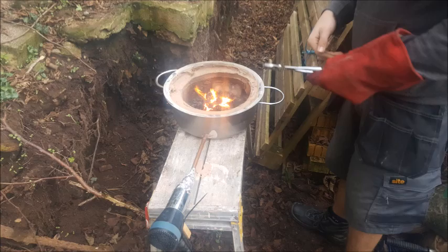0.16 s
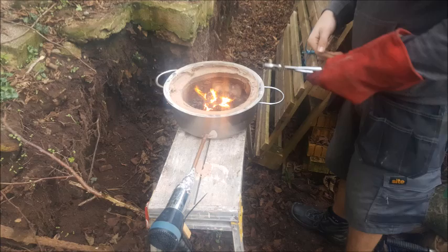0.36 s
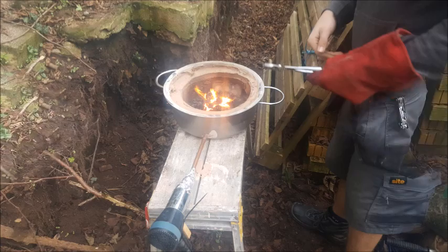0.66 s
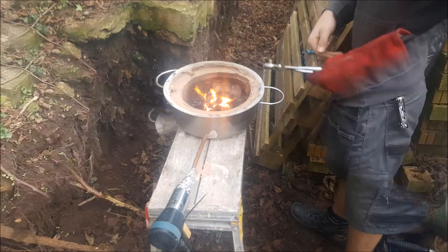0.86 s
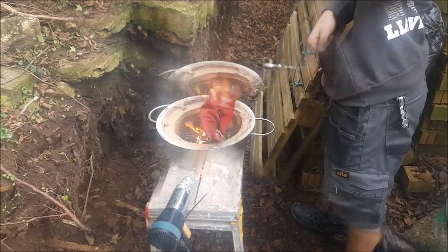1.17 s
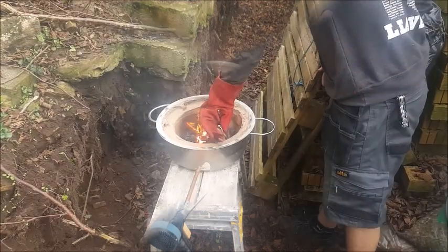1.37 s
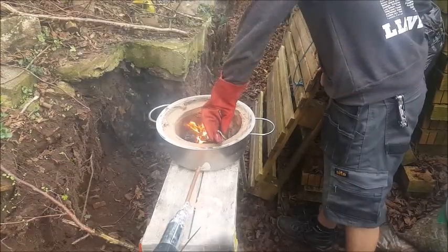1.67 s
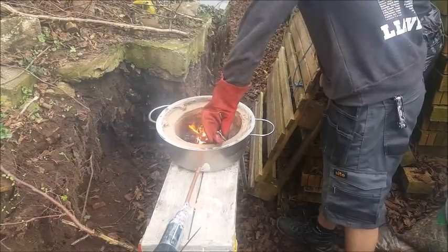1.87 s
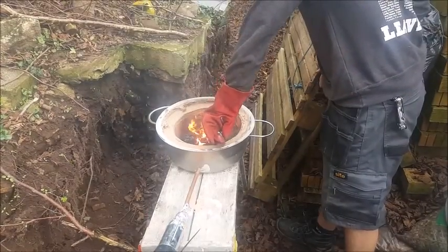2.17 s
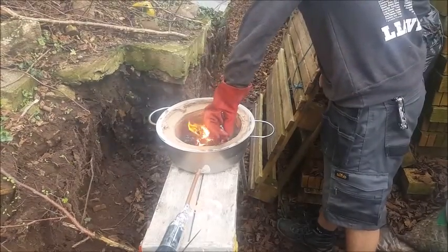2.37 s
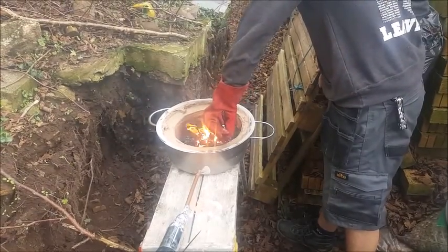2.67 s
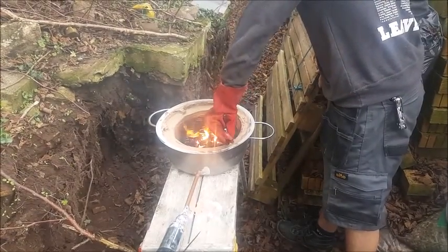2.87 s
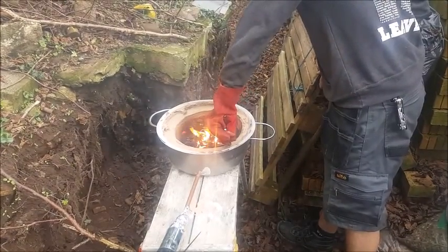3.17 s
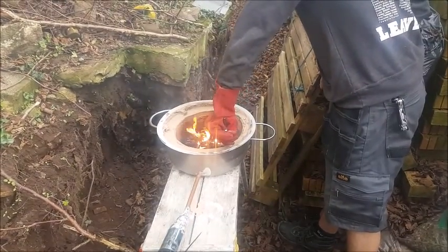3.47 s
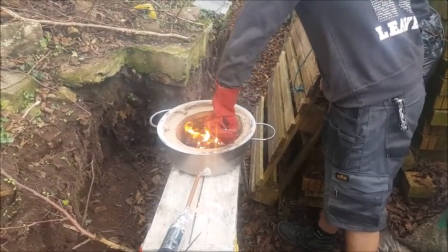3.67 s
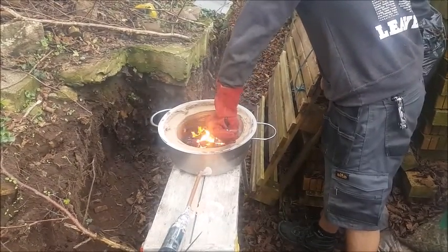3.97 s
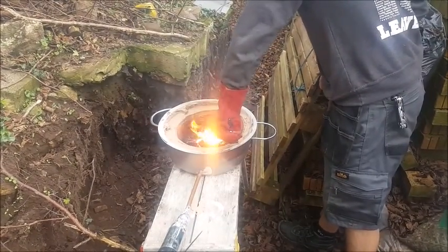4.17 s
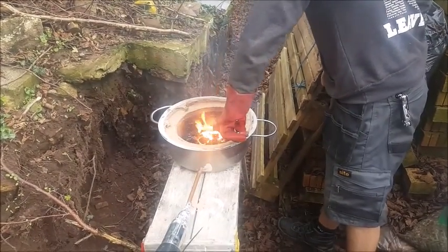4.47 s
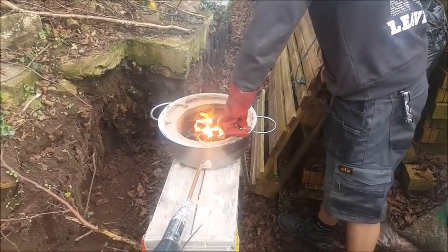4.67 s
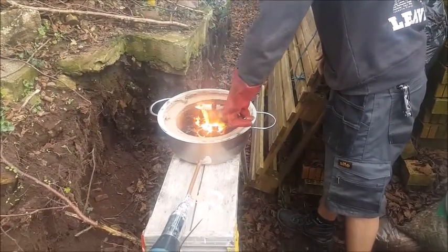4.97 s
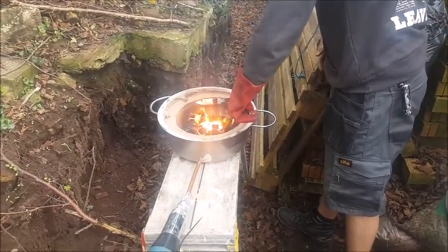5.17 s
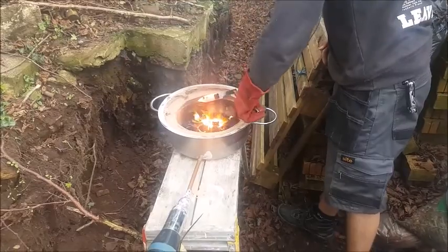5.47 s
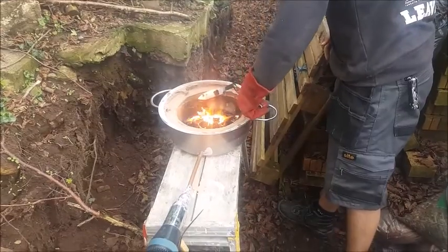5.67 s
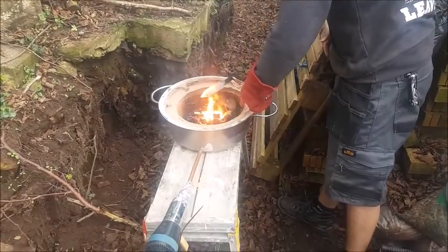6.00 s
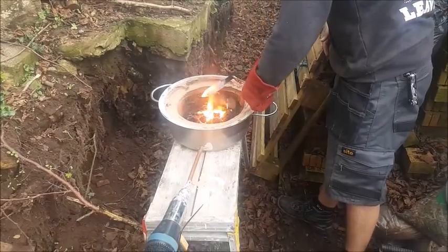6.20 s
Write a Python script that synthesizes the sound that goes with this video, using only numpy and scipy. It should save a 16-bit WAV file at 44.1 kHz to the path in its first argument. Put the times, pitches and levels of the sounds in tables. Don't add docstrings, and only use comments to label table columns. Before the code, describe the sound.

Close outdoors, a dryer forces air down a pipe into a pot of coals. The sound rises from silence into a dense, even rush with pipe colouring and a faint buzzing motor whine. The fire flutters and rumbles underneath, surging strongly around four seconds with dry snaps and low wind puffs, then settling. A small late spit and a final puff follow. Slightly grainy phone stereo, treble stronger on the left.

```python
import sys
import numpy as np
from scipy import signal
from scipy.fft import rfft, irfft, next_fast_len
from scipy.io import wavfile
from scipy.ndimage import uniform_filter1d, map_coordinates

SR = 44100
rng = np.random.default_rng(int(sys.argv[2]) if len(sys.argv) > 2 else 0)


def store_wav(level_fs):
    pcm = np.round(np.clip(np.atleast_2d(level_fs), -1, 1) * 32767)
    wavfile.write(sys.argv[1], SR, pcm.T.astype(np.int16))


def boost(x):
    u = np.asarray(x, float) / 20
    return 10 ** u


N = 279594
TURN_S = 3.6


def unit(x):
    return x / np.sqrt(np.mean(x ** 2) + 1e-20)


def along(points, hz):
    f, v = np.transpose(points)
    return np.interp(np.log(hz + 1), np.log(f + 1), v)


def wobble(rate):
    knots = rng.standard_normal(int(N * rate / SR) + 4)
    return map_coordinates(knots, [np.arange(N) * rate / SR])


def swell(s, length):
    return np.exp(-((np.arange(N) / SR - s) / length) ** 2)


def filtered(x, response):
    m = next_fast_len(N + SR // 2)
    hz = np.fft.rfftfreq(m, 1 / SR)
    return irfft(rfft(x, m) * response(hz), m)[..., :N]


def turbulence(patchy_db):
    # f/Hz, likeness/0-1
    likeness = [(30, .72), (140, .8), (200, .98), (700, .92), (1900, .77), (2120, .3), (2350, .68),
                (4100, .68), (4900, .3), (6300, .55), (8800, .1), (12000, .45), (15000, .05)]
    # f/Hz, phase/rad
    left_lead = [(0, 0), (850, 1.2), (1100, 1.7), (1500, 1.8), (1900, 2.6), (2250, 1.7), (3400, 2.4),
                 (3700, 3.3), (4900, 3.6), (5150, 5.8), (7700, 7), (10300, 16.5), (14500, 21.3),
                 (15800, 25)]
    z = signal.stft(rng.standard_normal((2, N)), nperseg=512)[2]
    patches = uniform_filter1d(rng.standard_normal(z.shape[1:]), size=6, axis=0)
    patches = uniform_filter1d(patches, size=10, axis=1)
    near, other = signal.istft(z * boost(patchy_db * unit(patches)), nperseg=512)[1][:, :N]

    def alike(hz):
        return np.clip(along(likeness, hz), 0, 1)

    def late(hz):
        return np.exp(-1j * np.interp(hz, *np.transpose(left_lead)))

    shared = filtered(near, lambda hz: alike(hz) * late(hz))
    own = filtered(other, lambda hz: np.sqrt(1 - alike(hz) ** 2))
    return np.array([near, shared + own])


def ports(hz):
    # f/Hz, level/dB per Hz
    left_stream = [(20, -88.0), (70, -77.6), (140, -80.9), (180, -70.7), (310, -61.5), (770, -62.0),
                   (1920, -65.3), (4000, -63.6), (4250, -72.3), (6770, -71.0), (9510, -73.7),
                   (10590, -87.4), (12460, -82.9), (15740, -90.9)]
    # f/Hz, level/dB per Hz
    right_stream = [(20, -87.2), (70, -76.1), (140, -79.3), (200, -69.1), (310, -61.5), (1670, -68.6),
                    (2470, -78.1), (3540, -71.5), (5390, -85.8), (5440, -89.8), (7590, -97.9),
                    (9360, -111.3), (11480, -96.1), (15650, -106.7)]
    # f/Hz, width/Hz, left/dB, right/dB
    ripples = [(242, 69, 2.9, 2.9), (365, 36, 3.9, 4.6), (438, 31, -5.7, -5.6), (494, 72, 3.3, 5.0),
               (630, 23, -2.6, -2.8), (716, 52, 2.6, 2.8), (883, 54, -2.6, -3.3), (919, 36, 7, 4),
               (958, 37, -4.2, -0.6), (1102, 27, 2.4, 4.0), (1188, 59, 3.9, 3.5), (1360, 50, -1.9, 1.2),
               (1446, 31, -5.7, -5.6), (1555, 92, 7.6, 1.3), (1699, 35, -3.9, -7.1), (1876, 68, 3.8, 1.5),
               (2059, 109, -0.3, -2.0), (2244, 60, 2.2, -1.4), (2641, 69, 1.7, 2.2), (2792, 42, -2.6, -0.8),
               (3033, 57, 1.2, 4.3), (3458, 54, -4.8, -0.7), (3865, 124, -2.9, -5.0),
               (4691, 177, -1.7, -4.0), (4997, 231, -2.5, 3.4), (5441, 181, -3.9, -2.3),
               (5946, 201, 1.6, 3.8), (6596, 141, 3.2, -0.0), (7316, 273, 1.6, -1.7),
               (8175, 149, 0.7, -6.9)]
    ripple_db = sum(np.outer([left, right], np.exp(-((hz - centre) / width) ** 2))
                    for centre, width, left, right in ripples)
    return boost(np.array([along(left_stream, hz), along(right_stream, hz)]) + ripple_db)


def rush():
    brighten_db_per_s, shade_db_per_s = 0.17, 0.18
    since = np.arange(N) / SR - TURN_S
    lean = lambda hz: ports(hz) * boost(-2.5 / (1 + (hz / 750) ** 3))
    stream = filtered(turbulence(patchy_db=0.72), lean) * np.sqrt(SR / 2)
    treble = filtered(stream, lambda hz: 1 / (1 + (4500 / (hz + 1)) ** 6))
    tilt = boost(brighten_db_per_s * since + 0.086 * wobble(8.9))
    turned = boost(np.outer([0, -1], shade_db_per_s * since))
    breath = boost(0.3 * wobble(12))
    return breath * turned * (stream + (tilt - 1) * treble)


def whine():
    # multiple, left/dB, right/dB, left lead/rad
    orders = [(1, -49.7, -49.8, .1), (3, -41.5, -45.5, .9), (5, -45.5, -47.3, 2), (6, -44.4, -53.9, 1.5),
              (7, -43.9, -50.5, -2.9), (8, -52, -55, 2), (11, -47.9, -68, 1.6), (14, -47.4, -61, 1.9),
              (15, -58, -61, 2.2), (16, -50.8, -62, 2.5), (17, -56.3, -67.6, 2.4), (30, -61.4, -79, -.6)]
    shaft_hz = 203.43
    turns = np.cumsum(shaft_hz + 0.2405 * wobble(3) + 0.274 * wobble(25)) / SR
    out = np.zeros((2, N))
    for k, left_db, right_db, lead in orders:
        phase = 2 * np.pi * (round(k) * turns + rng.random())
        tone = np.sin([phase, phase - lead]) * boost([[left_db], [right_db]])
        breath = boost(-0.1 + 2.1 * wobble(10))
        out += np.sqrt(2) * breath * tone
    return out


def flame():
    # f/Hz, level/dB
    roar_share = [(60, -60), (130, -0.5), (190, 4.5), (520, 3.5), (800, 2), (1500, -5), (4000, -60)]
    # f/Hz, level/dB per Hz
    flutter_colour = [(5, -60), (15, -20), (30, -10), (60, 0.5), (100, 2), (150, -2), (250, -34),
                      (600, -120)]
    # t/s, rise/dB, length/s
    flares = [
        (1.15, 1.5, 0.16),
        (1.67, 5, 0.052),
        (3.92, 7, .1),
        (4.12, 3.5, 0.092),
        (4.31, 7, 0.15),
        (5.5, 2.5, .15),
    ]
    # t/s, left rise/dB, right rise/dB, length/s
    puffs = [
        (2.81, 6, 9, .05),
        (3.84, 0, 20, .08),
        (4.16, 15, 17, .05),
        (4.368, 12, 17, 0.15),
        (4.58, 10, 13, 0.085),
        (6.25, 13, 13, .06),
    ]
    roar_db, sink_db_per_s, flutter_db = -38.5, 0.85, -68
    roar_db = roar_db - sink_db_per_s * (np.arange(N) / SR - TURN_S)
    roar_db += sum(rise_db * swell(s, length) for s, rise_db, length in flares)
    flutter_db = flutter_db + sum(np.outer(rise_db, swell(s, length)) for s, *rise_db, length in puffs)
    roar = unit(filtered(turbulence(patchy_db=0.5), lambda hz: ports(hz) * boost(along(roar_share, hz))))
    flutter = unit(filtered(turbulence(patchy_db=3.0), lambda hz: boost(along(flutter_colour, hz))))
    lumps_db = 1.5 * wobble(5) + 1.16 * wobble(14)
    flicker_db = 2.5 * wobble(6) + 2.4 * wobble(27)
    return boost(roar_db + lumps_db) * roar + boost(flutter_db + flicker_db) * flutter


def spits():
    # t/s, left/dB, right/dB
    cracks = [
        (3.842, -45, -42),
        (3.849, -39, -26),
        (3.879, -45, -38),
        (3.889, -56, -52),
        (4.441, -50, -46),
        (6.066, -50, -46),
    ]
    # f/Hz, level/dB per Hz
    crack_colour = [(150, -20), (1000, 2), (3000, 0), (6000, -8), (9500, -24), (12500, -13), (15500, -17)]
    out = np.zeros((2, N))
    t = np.arange(SR // 100) / SR
    for s, left_db, right_db in cracks:
        burst = rng.standard_normal(len(t)) * boost(-60 * t / 0.004)
        start = round(s * SR)
        out[:, start:start + len(t)] += boost([[left_db], [right_db]]) * burst
    return 3 * filtered(out, lambda hz: boost(along(crack_colour, hz)))


def starved(x, scatter_db):
    # f/Hz, left/dB, right/dB
    bars = np.array([(2500, -22, -20), (4500, -12, -8), (5500, -12, -3), (7000, -14, -3), (9000, -14, 2),
                     (10700, -5, -2), (12500, -8, -3), (14500, -6, -1), (15600, -2, 4)])
    lead_in = 762
    window = np.sin(np.pi * (np.arange(2048) + 0.5) / 2048)
    hz, _, z = signal.stft(np.pad(x, ((0, 0), (lead_in, 0))), SR, window, 2048)
    mean = uniform_filter1d(np.mean(abs(z) ** 2, axis=2), size=9, axis=1)[..., None]
    share_db = np.array([along(bars[:, [0, port]], hz) for port in (1, 2)])[..., None]
    luck = unit(uniform_filter1d(rng.standard_normal((2, 86, z.shape[2])), size=2, axis=2))
    luck = np.repeat(luck, 12, axis=1)[:, :len(hz)]
    kept = z * (abs(z) > np.sqrt(mean) * boost(share_db + scatter_db * luck))
    left_over = uniform_filter1d(np.mean(abs(kept) ** 2, axis=2), size=9, axis=1)[..., None]
    kept *= np.sqrt(mean / (left_over + 1e-30))
    return signal.istft(kept, SR, window, 2048)[1][:, lead_in:][:, :N]


def scene():
    return boost(0.2) * rush() + whine() + flame() + spits()


def top_cut(x):
    return signal.sosfilt(signal.butter(12, 16170, fs=SR, output="sos"), x)


def record(dry):
    # ramp starts t/s, sound opens t/s, full t/s
    fade_times = (.657, .66, .95)
    starts, opens, full = fade_times
    t = np.arange(N) / SR
    fade = np.clip((t - starts) / (full - starts), 0, 1) * (t > opens)
    limited = filtered(dry, lambda hz: hz < 15750)
    phone = starved(limited - 0.0005, scatter_db=4.5)
    return top_cut(phone * fade)


dry = scene()
out = record(dry)
store_wav(out)
```